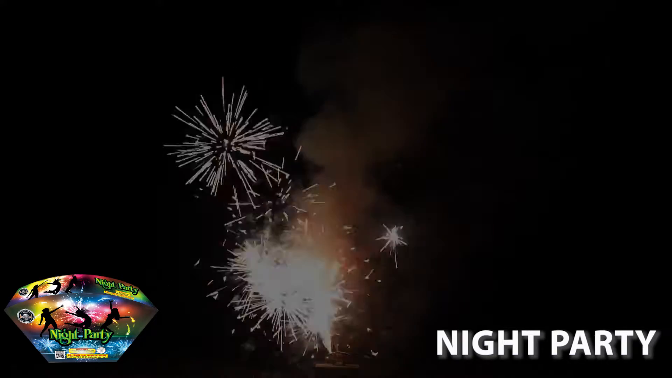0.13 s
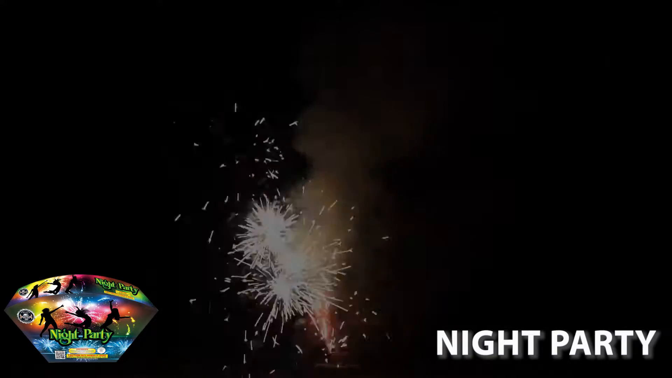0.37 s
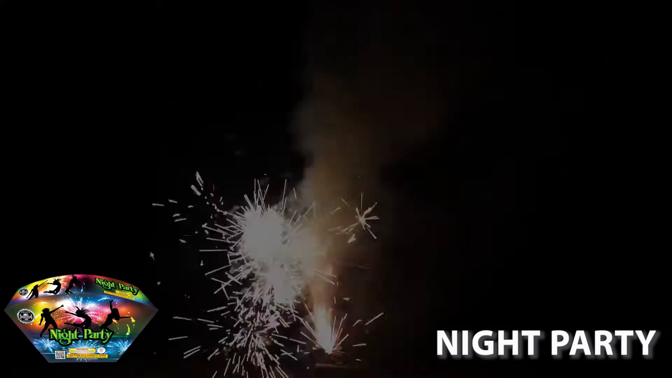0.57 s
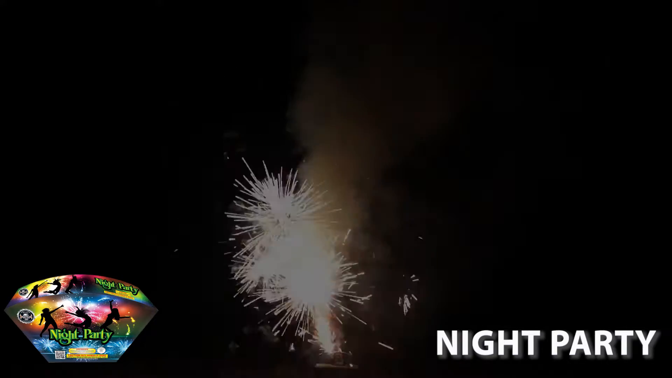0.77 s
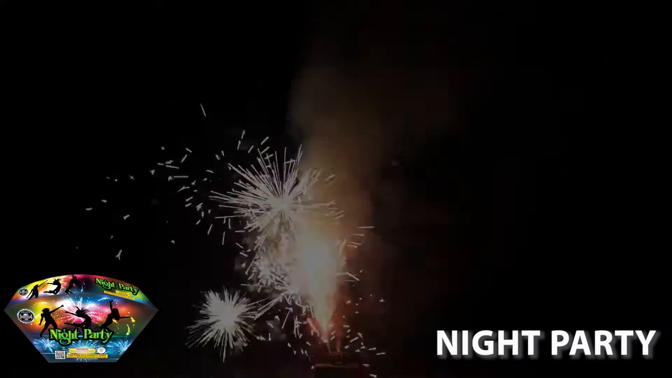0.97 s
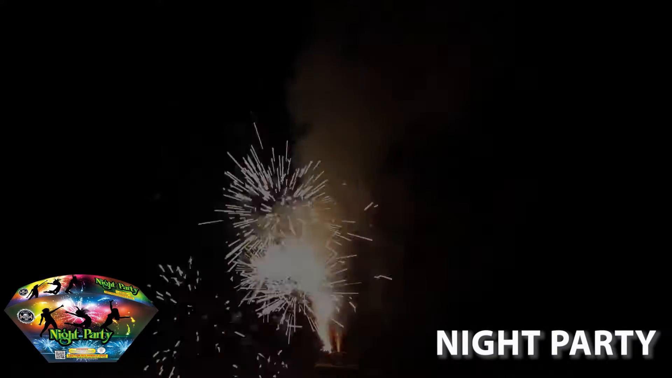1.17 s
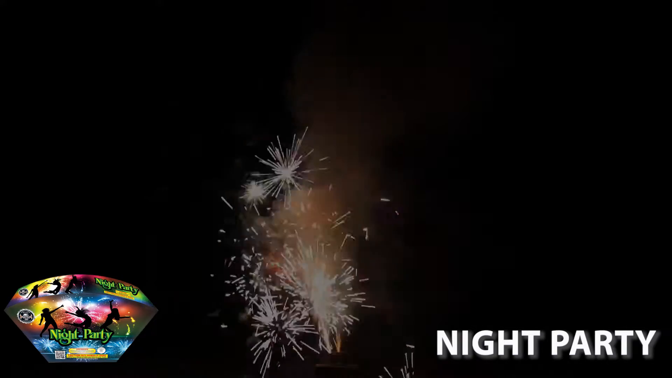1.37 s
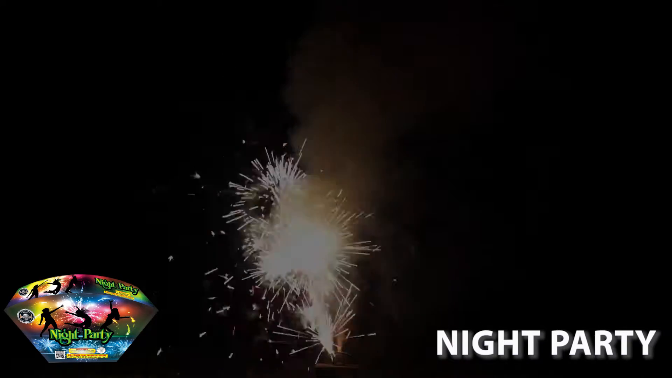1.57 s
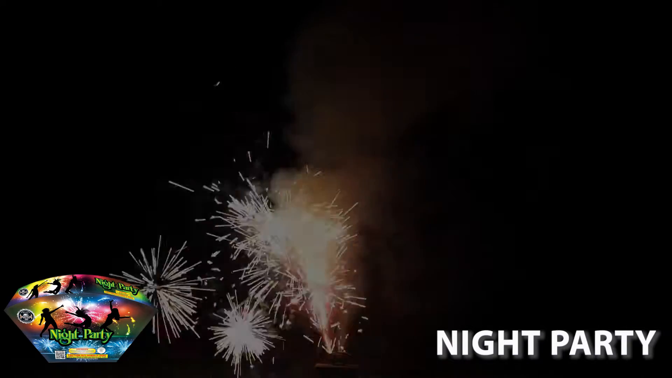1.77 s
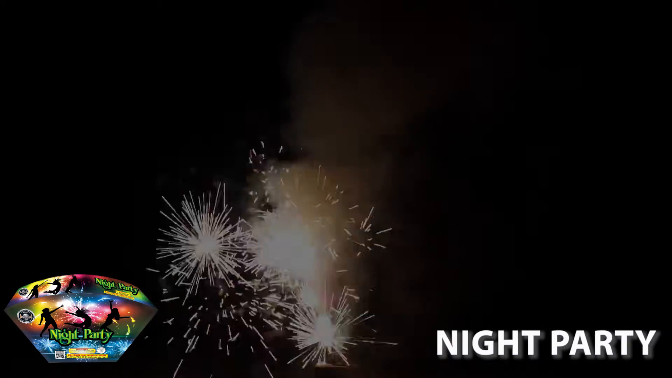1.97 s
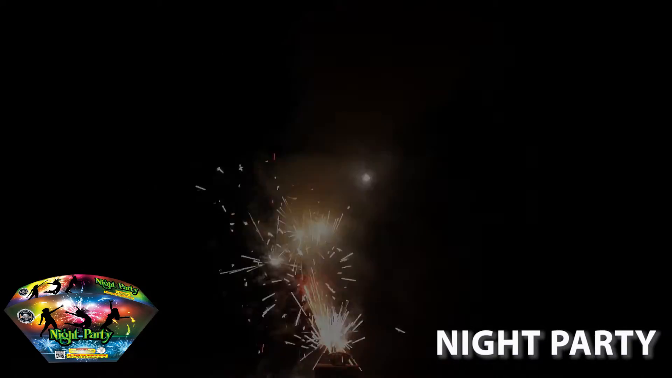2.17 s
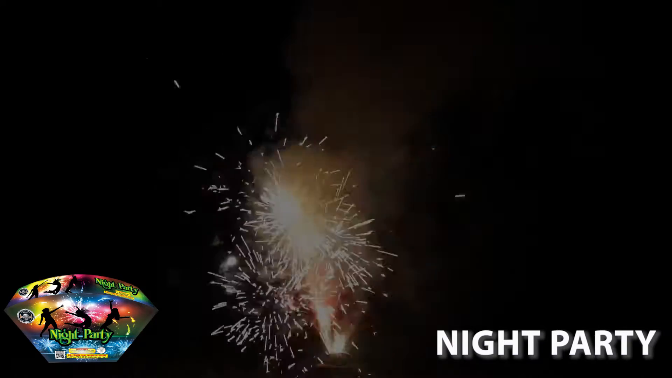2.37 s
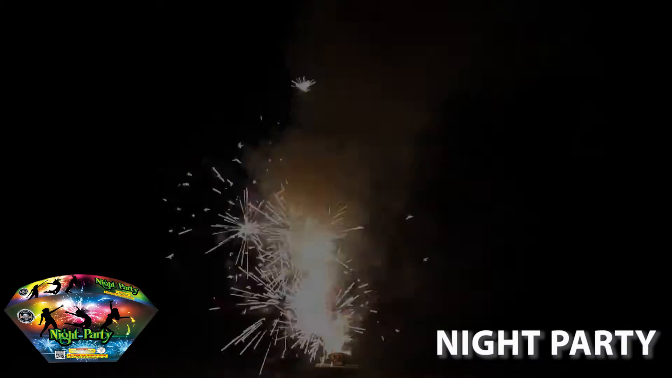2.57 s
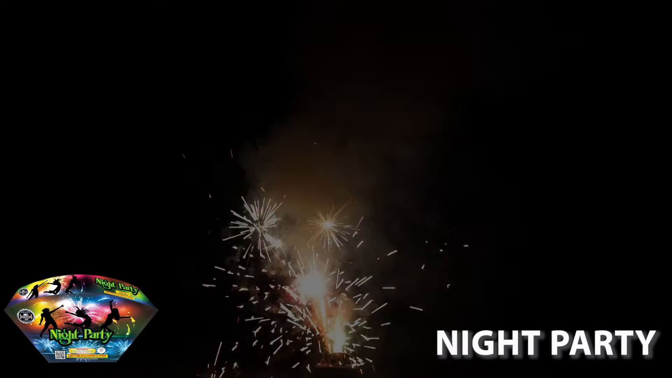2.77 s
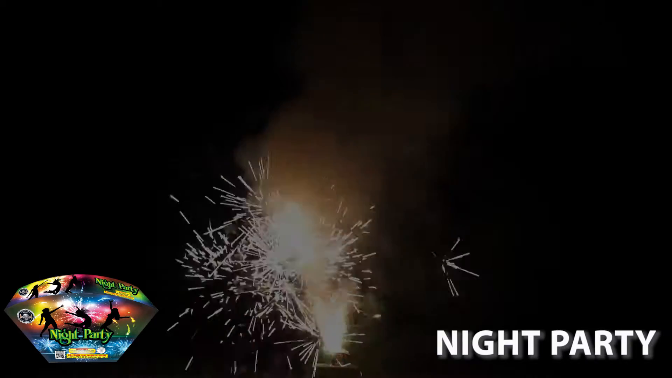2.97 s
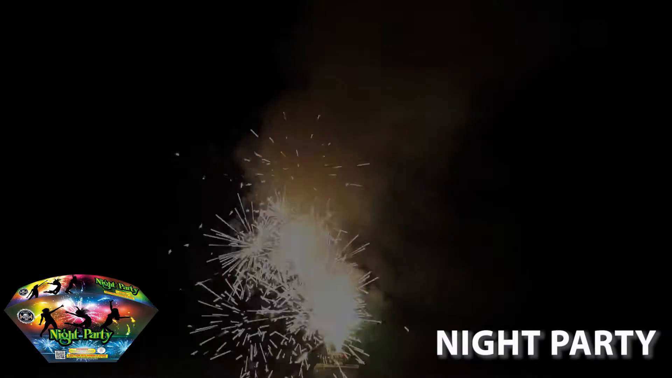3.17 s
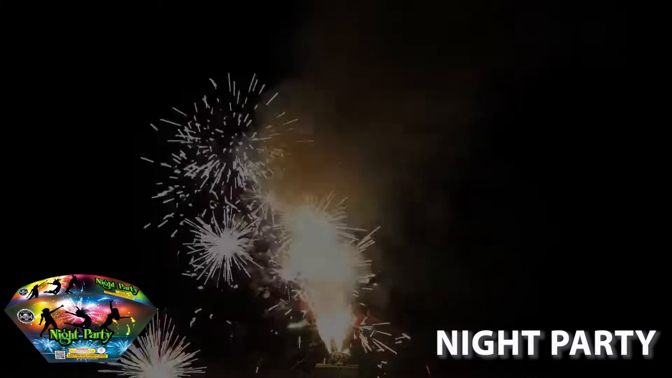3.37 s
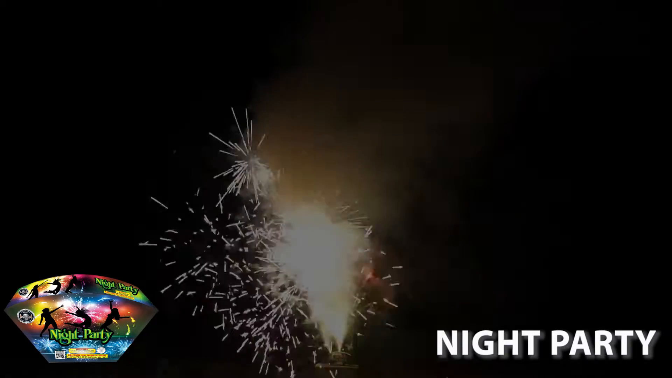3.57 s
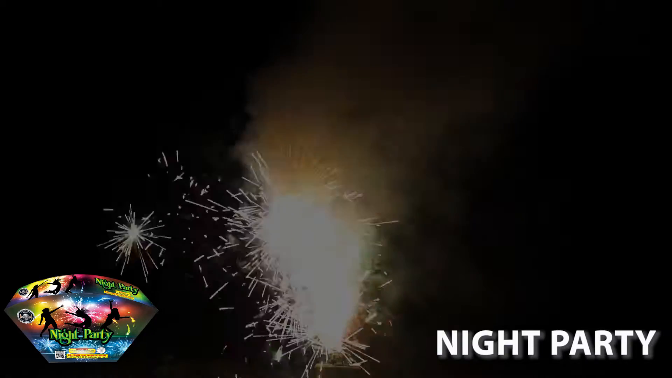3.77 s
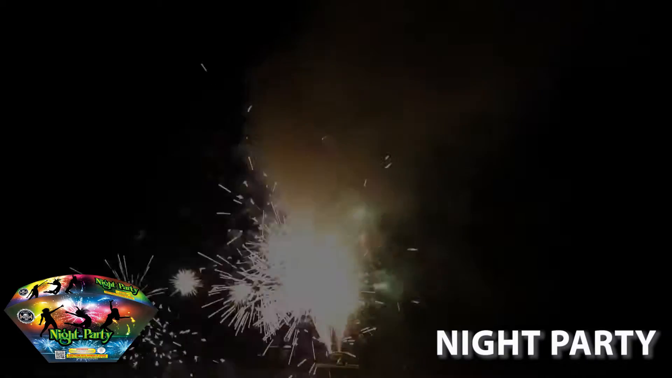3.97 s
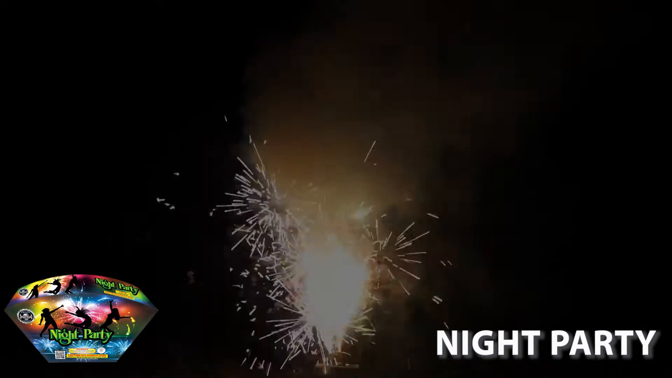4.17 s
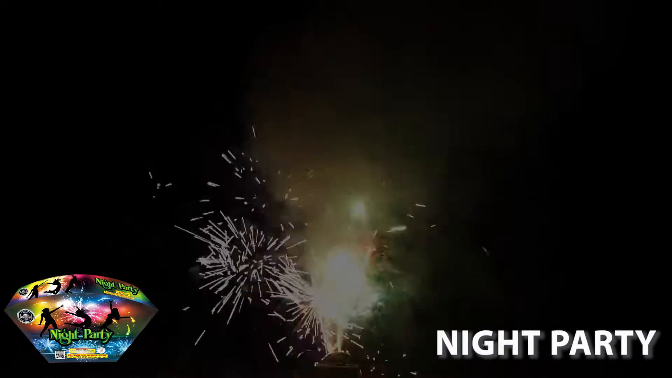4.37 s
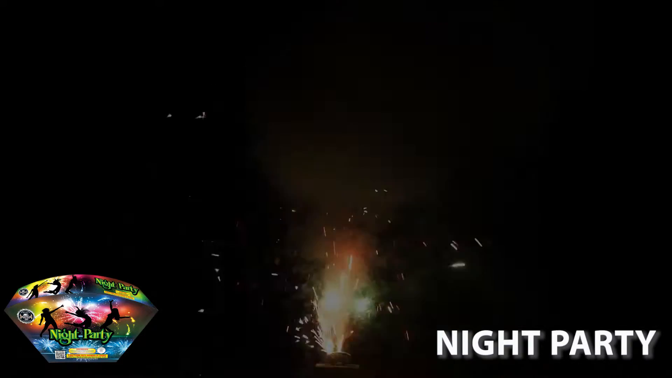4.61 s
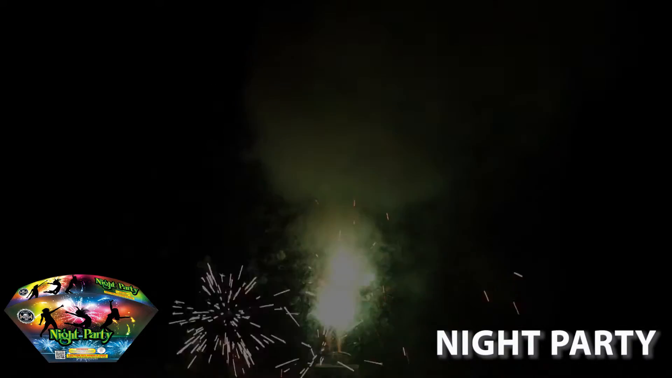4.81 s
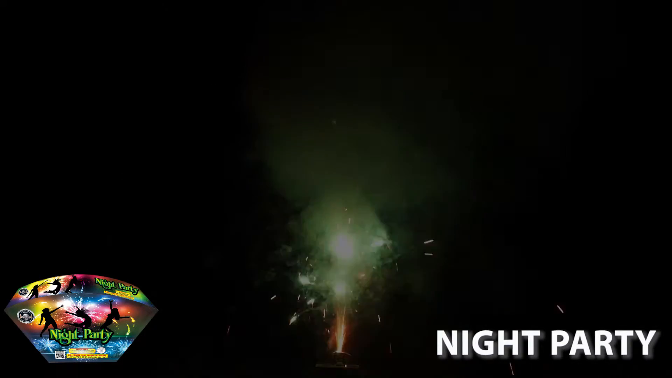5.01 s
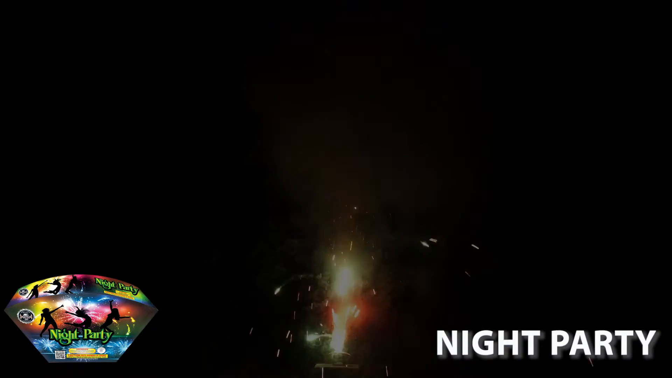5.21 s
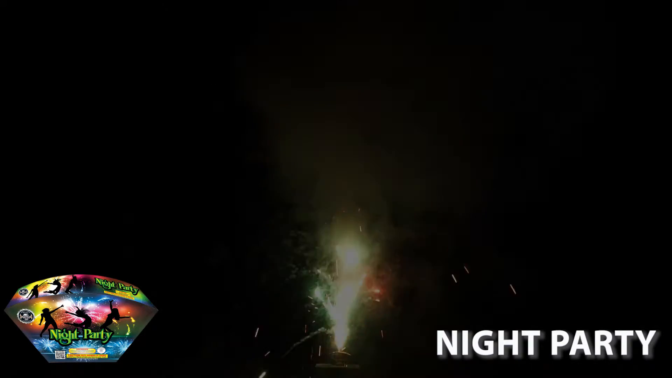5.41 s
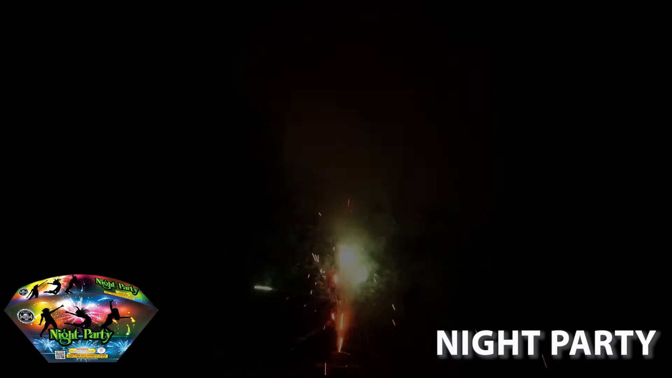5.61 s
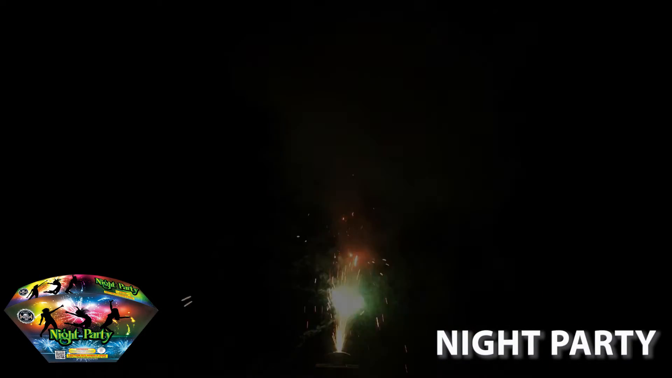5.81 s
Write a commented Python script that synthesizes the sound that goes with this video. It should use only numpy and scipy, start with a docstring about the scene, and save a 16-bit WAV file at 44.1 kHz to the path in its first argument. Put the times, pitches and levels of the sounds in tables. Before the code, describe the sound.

Dense, sharp firework crackling over a fizzing hiss outdoors, thinning out after four seconds to two last snaps and a faint flame hiss.

```python
"""Loud stars crack out of a random stream of lesser ones, over a fizz of sparks: a ground fountain
firework burning in the open at night. The stream falters and runs out, two last stars snap, and the
bare flame hisses on. Each star is an impulse, doubled by the ground and echoed, that can overload the
microphone; fizz and flame are filtered noise, and the flame also puffs and spits.
"""
import sys
import numpy as np
from scipy import signal
from scipy.fft import rfft, irfft
from scipy.io import wavfile

SR = 44100
rng = np.random.default_rng(int(sys.argv[2]) if len(sys.argv) > 2 else 0)


def unload_audio(sound):
    """Save the sound as a 16-bit wav file, at the path given as the first command line argument."""
    columns = np.transpose(np.atleast_2d(sound))
    # keep every value between -1 and 1, then stretch to whole-number steps
    steps = np.round(np.clip(columns, -1, 1) * 32767)
    wavfile.write(sys.argv[1], SR, steps.astype(np.int16))


N = 257984

# lag of the ground reflection for the lowest and the highest random stars
LOW_LAG_MS, HIGH_LAG_MS = 0.545, 2.32

# loud or lone stars; higher stars lag more: (time [s], strength [dB], ground reflection lag [ms])
LOUD_STARS = [(.003, 4.5, 2.5), (0.0429, 10, 2.26), (0.0498, 14.5, 1.7), (0.0626, 7, 1.7), (0.086, 6, 3.3),
              (0.0916, 4, 1.64), (0.1275, 12.5, 1.2), (0.1506, 12, 1.1), (0.1977, 15.5, 2.1),
              (0.2323, 16, 1.23), (0.2845, 13, 1.4), (0.3042, 11, 0.98), (.353, 14, 0.87),
              (0.3721, 14, 1.4), (0.3951, 13, 2.3), (.4304, 11, 1.8), (0.4635, 10, 1.28), (.472, 12, 1.04),
              (.5348, -5, 0.54), (0.5735, 13, 0.76), (0.6313, 14, 0.68), (0.6668, 12.5, 1.36),
              (0.695, 11.5, 1.7), (.715, 12, 2.1), (0.7388, 9, 1.8), (0.754, 13, 1.7), (.7864, 5.5, 1.04),
              (0.8413, 10, 1.7), (0.8609, 10.5, 1.2), (.9108, 14, 1.3), (0.9404, 10, 1.9), (0.989, 10, 2),
              (1.007, 7, 2), (1.0428, 14, 1.9), (1.0726, 14.5, 0.93), (1.1196, 13.5, 2), (1.181, 5.5, 2),
              (1.1959, 11, 1.6), (1.2224, 9.5, 2.4), (1.2779, 6.5, 0.96), (1.3015, 10.5, 1.7),
              (1.3156, 4, 2), (1.37, 9, 0.85), (1.4135, 10, 1.26), (1.4542, 6.5, 2.2), (1.4755, 5, 2.1),
              (1.5106, 10.5, 1.7), (1.5401, 11, 1.2), (1.6054, 11, 1.63), (1.6325, 10.5, 1.55),
              (1.6507, 9.5, 1.27), (1.7101, 6.5, 1.5), (1.7382, 3, 0.95), (1.7723, 11.5, 1.17),
              (1.807, 9, 1.6), (1.8377, 13, 1.4), (1.8796, 11, 2.5), (1.9025, 10.5, 1.55),
              (1.9416, 10, 2.4), (2.0165, 10, 1.3), (2.0209, 10, 1.25), (2.0561, 12, 2.1),
              (2.106, 9.5, 1.2), (2.1531, 8.5, 0.69), (2.1789, 7, 1.2), (2.224, 2.5, 1.4),
              (2.2587, 10, 1.3), (2.3126, 10, 1.7), (2.3409, 4, 1.3), (2.3843, 12.5, 1.22),
              (2.4812, 12.5, 1.8), (2.539, 10, 1.1), (2.5609, 6.5, 1.8), (2.6424, 8, 1.1),
              (2.6726, 9.5, 1.4), (2.6898, 8, 0.67), (2.7263, 8.5, 1.6), (2.764, 4, 1.75),
              (2.7796, -4, 0.53), (2.7947, 12, 1.08), (2.8257, 7, 0.58), (2.8393, 4.5, 0.87),
              (2.8681, 5, 1.55), (2.8868, 11, 1.35), (2.9144, 9.5, 1.37), (2.9665, 8, 1.26),
              (2.9839, 8, 1.35), (3.0242, 9.5, 1.13), (3.057, 6, .7), (3.1087, 9.5, 1.66),
              (3.1555, 10, 1.2), (3.2, 6, 1.26), (3.2212, 9, 0.86), (3.2372, 12.5, 0.81), (3.2541, 9, 1.4),
              (3.2815, 6, 1.6), (3.3156, 7, 2.1), (3.3237, 7, 1.8), (3.3577, 4.5, 1.9), (3.3861, 10.5, 1.3),
              (3.4639, 7, 1.95), (3.5456, 8.5, 1.46), (3.5571, 7, 1.3), (3.5983, 3.5, 1.17),
              (3.677, 3.5, 2.1), (3.691, 7.5, 1.2), (3.8085, 8, 1.6), (3.8216, 5.5, 1.1), (3.8538, 3, 1.6),
              (3.9271, 4.5, 1.24), (3.9676, 5, 1.6), (3.9806, 8, 1.3), (4.0735, 8, 1.5), (4.1183, 9.5, 2.4),
              (4.1505, 5, 2.06), (4.1736, 5.5, 2), (4.1907, 5, 1.3), (4.2051, 9, 1.35), (4.2113, 4, 1.56),
              (4.2308, 5, 2), (4.2475, 4, 1.28), (4.2557, 4.5, .9), (4.2748, 2, 1), (4.2884, 10.5, 1.8),
              (4.2991, 0, 2.2), (4.312, -9, .6), (4.3303, -2, 1.05), (4.3462, -3, 1.7), (4.361, 8, 1.5),
              (4.4143, 6, 2), (4.4198, 1, 1.2), (4.4378, 6.5, 1.47), (4.4523, 2, 1.1), (4.473, -8, 0.66),
              (4.5031, 0.5, 2), (4.5512, -3, 0.6), (4.5648, -10, .6), (4.5702, 5.5, 0.65),
              (4.5993, 9, 1.38), (4.6245, -10.5, .6), (4.6602, -8, .6), (4.6754, -7, 0.76),
              (4.6805, -10, 0.54), (4.7045, -14.5, 0.62), (4.8649, 4.5, 0.91), (4.8776, 5, 0.64)]


def crackle():
    """Loud stars, lesser stars and crumbs burst alike, each with its echoes."""
    time_s, strength_db, lag_ms = np.vstack([LOUD_STARS, lesser_stars(), crumbs()]).T
    size = gain_of(strength_db)
    return shocks(time_s, size, lag_ms) + echoes(time_s, size)


# pace of the lesser stars: (time [s], rate [stars/s])
STAR_PACE = [(0, 90), (1.1, 85), (1.5, 95), (2.3, 105), (3.3, 110), (3.6, 135), (4.1, 135), (4.17, 0)]


def lesser_stars(count=520, first_db=1.84, spread_db=4.5, sag_db_per_s=0.2, stray_gaps=1.6):
    """A loose stream, most at middle height, sinks as the charge burns down: rows as in LOUD_STARS."""
    when, size, lift, drift = rng.random((count, 4)).T
    t = np.arange(N) / SR
    thrown = np.cumsum(np.interp(t, *np.transpose(STAR_PACE))) / SR
    # each star strays by up to stray_gaps mean gaps from an even pace
    turn = np.arange(count) + stray_gaps * when
    time_s = np.interp(turn, thrown, t)
    strength_db = first_db - sag_db_per_s * time_s + spread_db * (2 * size - 1) + flow_db(time_s)
    height = (lift + drift) / 2
    lag_ms = LOW_LAG_MS + (HIGH_LAG_MS - LOW_LAG_MS) * height
    stars = np.column_stack([time_s, strength_db, lag_ms])
    return stars[turn < thrown[-1]]


def crumbs(mean_db=-13, spread_db=6, follow_share=0.21, count=330):
    """Crumbs of stars tick at random, thinning out with a weak shower: rows as in LOUD_STARS."""
    when, size, height = rng.random((count, 3)).T
    thickness = shower()
    burnt = np.cumsum(np.minimum(thickness, np.median(thickness)) ** 4)
    time_s = np.interp(when, burnt / burnt[-1], np.arange(N) / SR)
    strength_db = mean_db + spread_db * (2 * size - 1) + follow_share * flow_db(time_s)
    lag_ms = LOW_LAG_MS + (HIGH_LAG_MS - LOW_LAG_MS) * height ** 2
    return np.column_stack([time_s, strength_db, lag_ms])


# the stream falters: (start [s], length [s])
STREAM_LULLS = [(.163, .027), (.255, .028), (.318, .034), (.41, .05), (.676, .062), (1.135, .044),
                (1.96, .055), (2.075, .024), (2.45, .03), (2.70, .165), (3.072, .02), (3.287, .026),
                (3.327, .029), (3.512, .024), (3.947, .02), (3.987, .028), (4.09, .027), (4.132, .037)]


def flow_db(time_s, lull_db=-20.5, hush_db=-15.5, hush_s=0.012, flurry_db=3.5, flurry_s=0.013):
    """The stream is weak in lulls and before a loud star, which then sets off its neighbours."""
    start_s, length_s = np.transpose(STREAM_LULLS)
    at = time_s[:, None]
    in_lull = ((at > start_s) & (at < start_s + length_s)).any(1)
    since_s = at - np.transpose(LOUD_STARS)[0]
    hush = ((since_s < 0) * np.exp(-(since_s / hush_s) ** 4)).max(1)
    flurry = ((since_s > 0) * np.exp(-abs(since_s) / flurry_s)).max(1)
    return np.where(in_lull, lull_db, hush_db * hush + flurry_db * flurry)


# colour of one shock: (frequency [Hz], gain [dB])
SHOCK_COLOUR = [(60, -24.5), (250, -3.5), (600, 1), (1400, 0.3), (2200, -1), (4000, 0.45), (7000, 1.98),
                (9300, 2), (10200, -2.5), (12000, -6.5), (16000, -26.5)]


def shocks(time_s, size, lag_ms, bounce=0.46, bounce_hz=6500, soft_share=0.55, soft_hz=5500, tube_db=-3):
    """Each star sends a shock straight to the listener and a duller one by way of the ground."""
    # some stars burst less abruptly and sound duller
    soft = soft_share * rng.random(len(time_s)) ** 2
    direct = clicks(time_s, size * (1 - soft)) + dulled(clicks(time_s, size * soft), soft_hz)
    reflected = bounce * dulled(clicks(time_s + lag_ms / 1000, size), bounce_hz)
    # the lowest stars make the mouth of the tube ring
    nearness = np.clip((0.85 - lag_ms) / 0.31, 0, 1)
    tube = gain_of(tube_db) * banded(clicks(time_s, size * nearness), low_hz=2830, high_hz=3750)
    return coloured(direct + reflected + tube, SHOCK_COLOUR)


# scatter by the rough ground: (frequency [Hz], gain [dB])
GROUND_COLOUR = [(40, -15.5), (140, 2), (280, -3), (450, 4), (900, -3), (1600, 1.5), (3000, -4),
                 (9000, -8.5), (16000, -24.5)]
# echo of nearby objects and the surroundings: (frequency [Hz], gain [dB])
YARD_COLOUR = [(40, -8), (250, -8), (1400, -8), (4000, -7), (8500, -2), (12000, -8.5), (16000, -20)]


def echoes(time_s, size, spread=0.78, ground_db=-8, near_db=-19, yard_db=-17):
    """Rough ground, nearby objects and the wider yard scatter each shock, ever later and longer."""
    # strong shocks lose more on the way, so their echoes grow less than they do
    spreading = clicks(time_s, size ** spread)
    ground = gain_of(ground_db) * scatter(spreading, start_ms=0.91, t60_s=0.012, count=24)
    near = gain_of(near_db) * scatter(spreading, start_ms=2, t60_s=0.038, count=8)
    yard = gain_of(yard_db) * scatter(spreading, start_ms=8, t60_s=0.64, count=4)
    return coloured(ground, GROUND_COLOUR) + coloured(near + yard, YARD_COLOUR)


def scatter(x, start_ms, t60_s, count):
    """Diffuse dying echoes; stars burst in different places, so the echo path keeps changing."""
    t = np.arange(int(t60_s * SR) + 2) / SR
    path = np.repeat(rng.integers(0, count, N // 256 + 1), 256)[:N]
    fade = gain_of(-60 * t / t60_s)
    tails = rng.standard_normal((count, len(t))) * fade / np.linalg.norm(fade)
    scattered = sum(signal.oaconvolve(x * (path == k), tail)[:N] for k, tail in enumerate(tails))
    return delayed(scattered, start_ms)


# thickness of the spark shower: (time [s], level [dB])
SHOWER_LEVEL = [(0, -30), (0.248, -33.5), (.65, -32.5), (1.099, -31.5), (1.471, -31), (1.97, -33),
                (2.75, -32), (3.4, -30), (3.8, -31.5), (4.27, -33), (4.53, -42.5), (4.682, -48.5),
                (4.75, -51)]


def shower():
    """Strength of the spark shower over time, falling away after its last level."""
    time_s, level_db = np.transpose(SHOWER_LEVEL)
    time_s, level_db = np.append(time_s, time_s[-1] + 0.24), np.append(level_db, -80)
    return gain_of(np.interp(np.arange(N) / SR, time_s, level_db))


# fizz of the burning sparks: (frequency [Hz], relative density [dB per Hz])
FIZZ_COLOUR = [(40, -39), (200, 13.5), (600, 0), (1400, 4), (3000, 9), (7000, 4), (9200, 2.5),
               (11500, -0.5), (16000, -21)]


def fizz(level_db=-16.0, grain_db=1.5, flicker_db=3.0):
    """Countless burning sparks merge into a grainy, flickering hiss."""
    grain = np.minimum(rng.exponential(1, N), 6)
    grains = rng.standard_normal(N) * gain_of(grain_db * grain)
    flicker = gain_of(level_db - flicker_db * wander(39))
    return evened(coloured(grains, FIZZ_COLOUR)) * shower() * flicker


# flame jet, rippled by its ground reflection: (frequency [Hz], relative density [dB per Hz])
JET_COLOUR = [(40, -12), (230, -5.5), (400, -4.5), (600, -17), (900, -12.5), (1500, 1), (2100, -12.5),
              (3150, -2), (3850, -13.5), (4700, -6.5), (5400, -7.5), (6800, 4.5), (8200, -7), (16000, -26)]
# soft puffs of the flame: (time [s], level [dB], half-length to 1/e [s])
FLAME_PUFFS = [(4.68, -57, 0.016), (4.753, -64, 0.016), (5.287, -68, .04), (5.372, -69, .015),
               (5.784, -60, 0.012)]
# dull spits in the tube's mouth, before colouring: (time [s], level [dB])
FLAME_SPITS = [(4.4936, -4), (4.6140, -3), (4.735, -17), (4.7560, -14), (4.7610, -18), (4.8262, -7.5)]


def flame(level_db=-57, waver_db=0.1, spit_hz=3200):
    """The jet hisses and spits at the nozzle, and the flame above it puffs."""
    t = np.arange(N) / SR
    jet = evened(coloured(rng.standard_normal(N), JET_COLOUR))
    hiss = jet * gain_of(level_db - waver_db * wander(6.7))
    swell = sum(gain_of(db) * np.exp(-((t - s) / length) ** 2) for s, db, length in FLAME_PUFFS)
    puffs = evened(banded(rng.standard_normal(N), low_hz=183, high_hz=300)) * swell
    time_s, spit_db = np.transpose(FLAME_SPITS)
    spits = coloured(dulled(clicks(time_s, gain_of(spit_db)), spit_hz), JET_COLOUR)
    return hiss + puffs + spits


def gain_of(db):
    """Decibels to a factor."""
    return 10 ** (np.asarray(db) / 20)


def evened(x):
    """Scales to rms 1."""
    return x / np.sqrt(np.mean(x ** 2) + 1e-20)


def coloured(x, points, size=2048):
    """Causal minimum-phase filter with the given (frequency [Hz], gain [dB]) outline."""
    hz, db = np.transpose(points)
    outline_db = np.interp(np.log(np.fft.rfftfreq(size, 1 / SR) + 1), np.log(hz), db)
    # folding the cepstrum forward in time makes the filter minimum-phase
    cepstrum = irfft(np.log(gain_of(outline_db)))
    cepstrum[1:size // 2] *= 2
    cepstrum[size // 2 + 1:] = 0
    response = irfft(np.exp(rfft(cepstrum)))
    return signal.oaconvolve(x, response)[:N]


def banded(x, low_hz, high_hz):
    """Broad resonance between two frequencies."""
    return signal.sosfilt(signal.butter(2, [low_hz, high_hz], "band", fs=SR, output="sos"), x)


def dulled(x, hz):
    """Gentle two-pole low-pass."""
    pole = np.exp(-2 * np.pi * hz / SR)
    return signal.lfilter([(1 - pole) ** 2], [1, -2 * pole, pole ** 2], x)


def clicks(time_s, sizes, size=8):
    """Impulses at exact times between samples, each a short windowed sinc."""
    at = time_s[:, None] * SR
    index = np.floor(at).astype(int) + np.arange(1 - size, size + 1)
    shape = np.sinc(index - at) * np.cos(np.pi * (index - at) / (2 * size)) ** 2
    # impulses off the end collect in one spare sample, cut away
    return np.bincount(np.clip(index, 0, N).ravel(), (sizes[:, None] * shape).ravel(), N + 1)[:N]


def delayed(x, ms):
    """The same sound later, by a phase slope that allows fractions of a sample."""
    return irfft(rfft(x) * np.exp(-2j * np.pi * np.fft.rfftfreq(N, 1 / SR) * ms / 1000), N)


def wander(cutoff_hz):
    """Slow random curve of rms 1: low-passed noise."""
    lowpass = 1 / (1 + (np.fft.rfftfreq(N, 1 / SR) / cutoff_hz) ** 4)
    return evened(irfft(rfft(rng.standard_normal(N)) * lowpass, N))


def scene():
    """Crackling stars, spark fizz and flame, heard from one spot."""
    return (crackle() + fizz() + flame())[None]


def record(dry, case_echo=0.075, case_ms=0.505, ceiling=0.26, hardness=5, low_cut_hz=45, edge_hz=16000):
    """An inverting microphone with a short case echo overloads on the shocks; then the band limits."""
    mic = case_echo * delayed(dry[0], case_ms) - dry[0]
    # the overload is analogue, so it acts between the samples too
    fine = signal.resample_poly(mic, 2, 1)
    overloaded = fine / (1 + abs(fine / ceiling) ** hardness) ** (1 / hardness)
    clipped = signal.resample_poly(overloaded, 1, 2)
    centred = signal.lfilter(*signal.butter(1, low_cut_hz, "high", fs=SR), clipped)
    band_limit = signal.firwin(255, edge_hz, window=("kaiser", 9), fs=SR)
    return signal.oaconvolve(centred, band_limit, "same")[None]


dry = scene()
out = record(dry)
unload_audio(out)
```